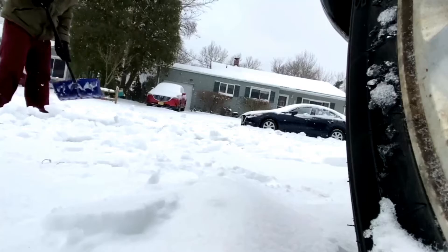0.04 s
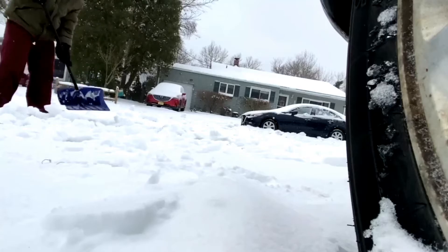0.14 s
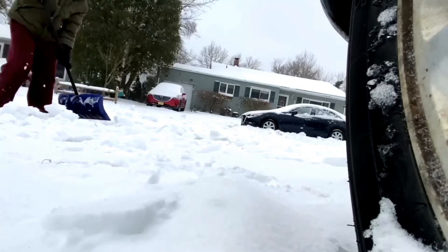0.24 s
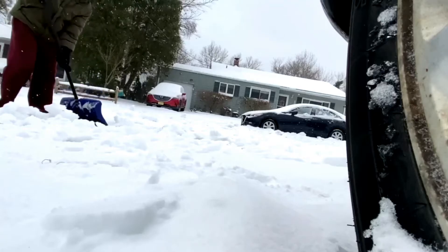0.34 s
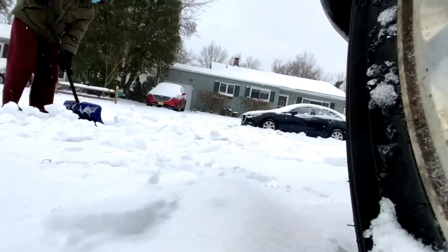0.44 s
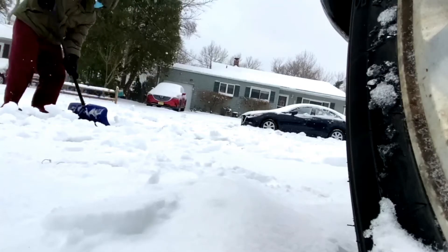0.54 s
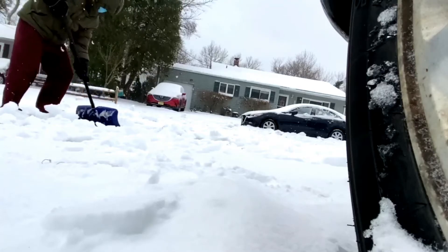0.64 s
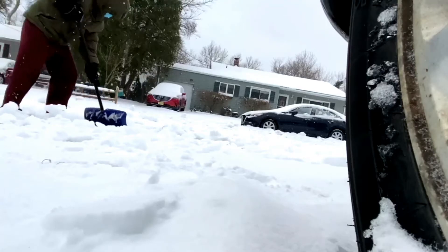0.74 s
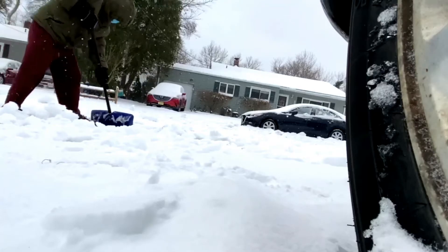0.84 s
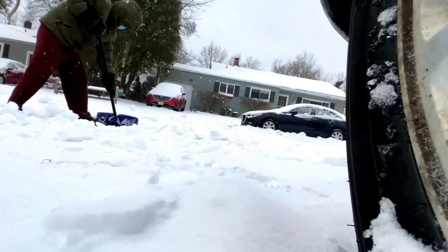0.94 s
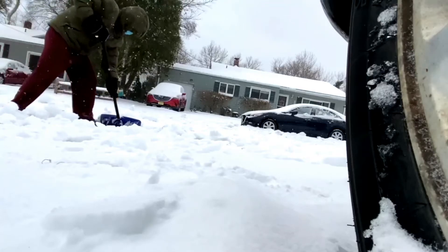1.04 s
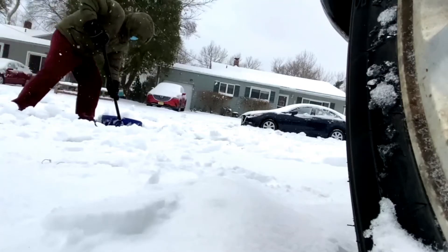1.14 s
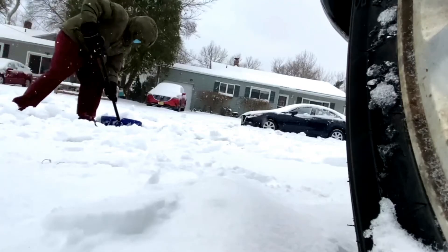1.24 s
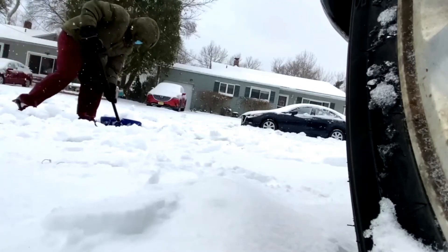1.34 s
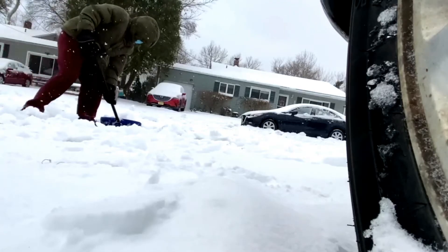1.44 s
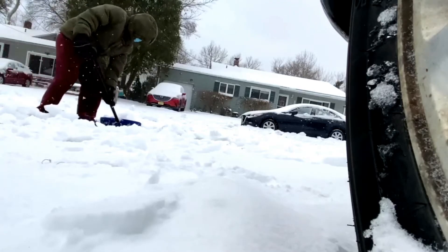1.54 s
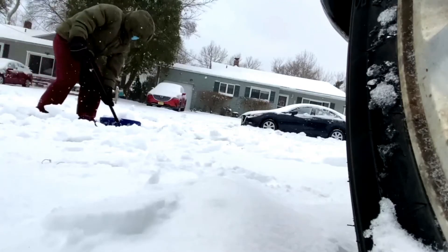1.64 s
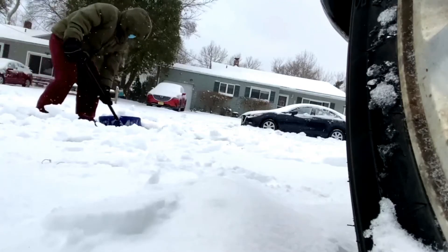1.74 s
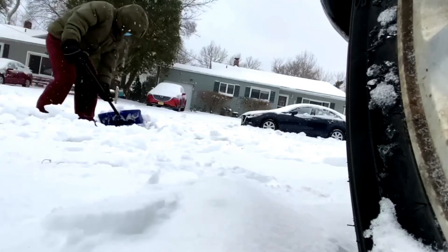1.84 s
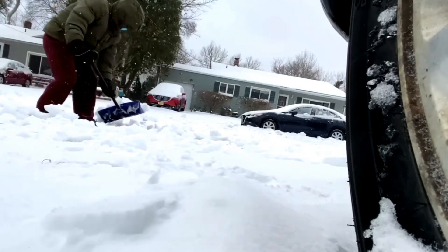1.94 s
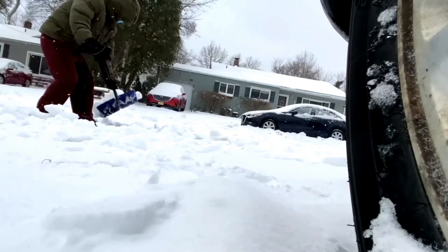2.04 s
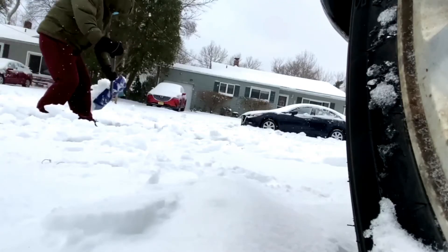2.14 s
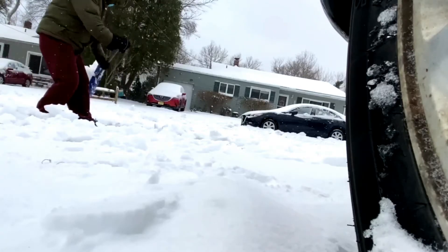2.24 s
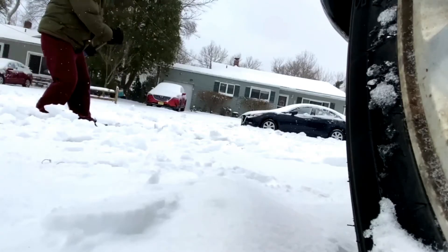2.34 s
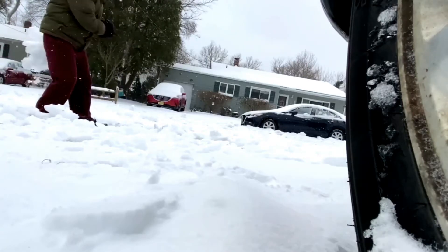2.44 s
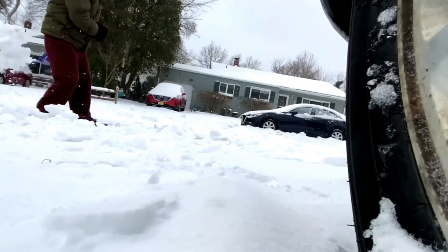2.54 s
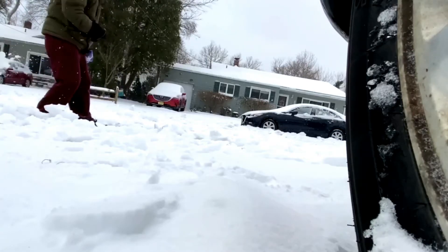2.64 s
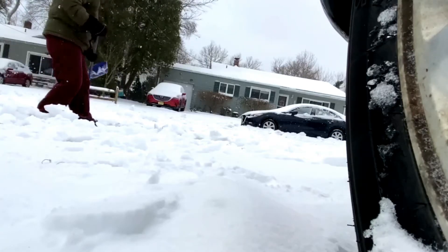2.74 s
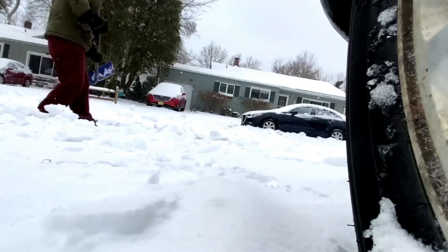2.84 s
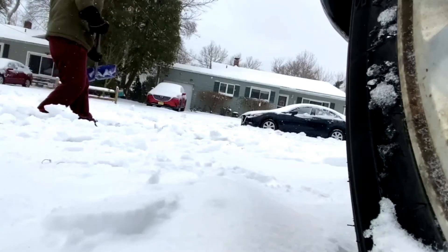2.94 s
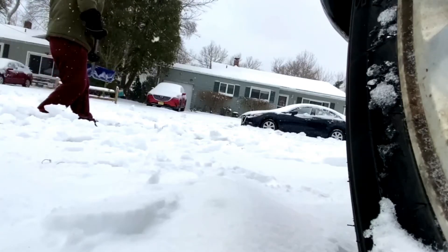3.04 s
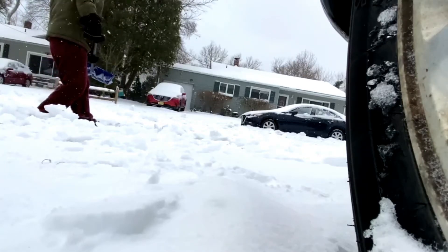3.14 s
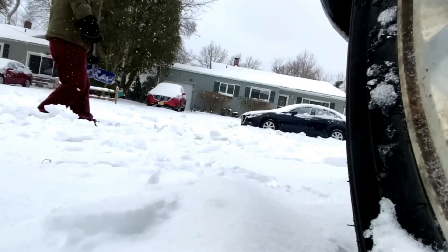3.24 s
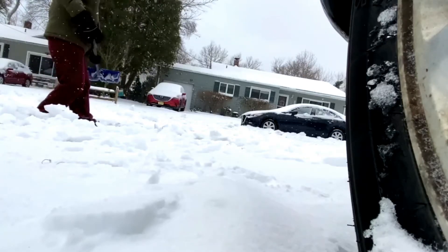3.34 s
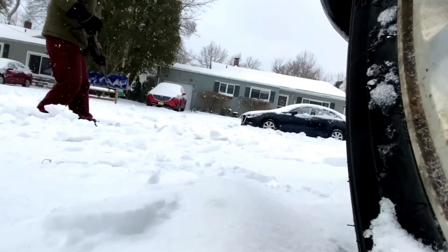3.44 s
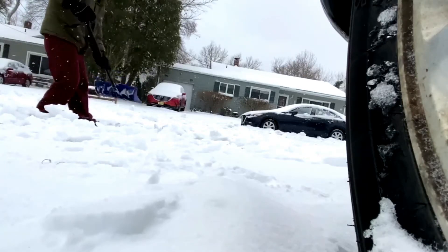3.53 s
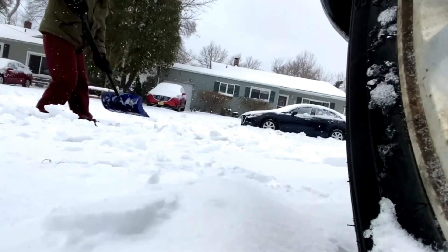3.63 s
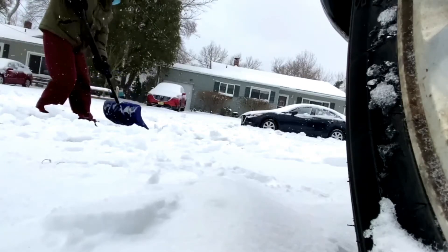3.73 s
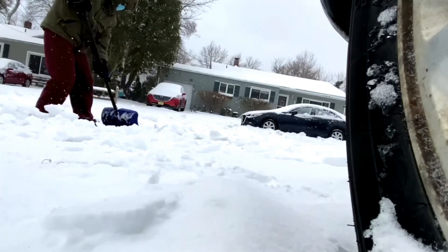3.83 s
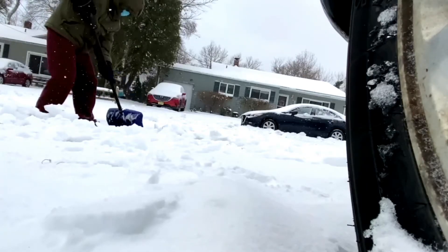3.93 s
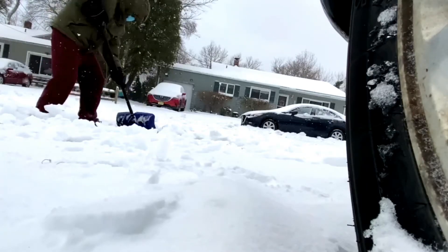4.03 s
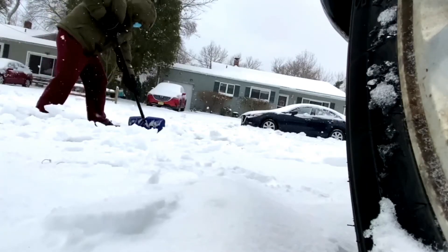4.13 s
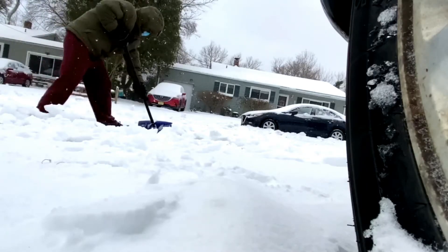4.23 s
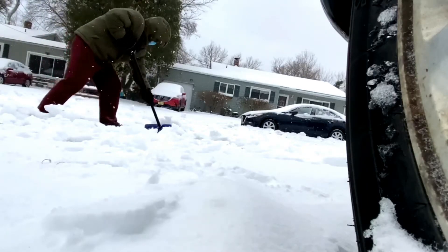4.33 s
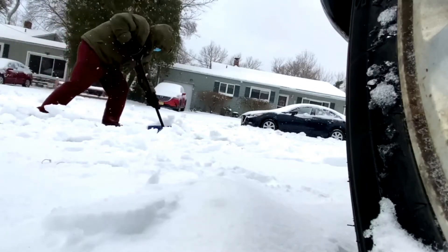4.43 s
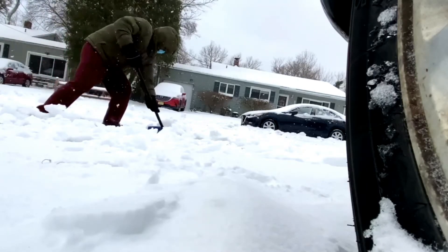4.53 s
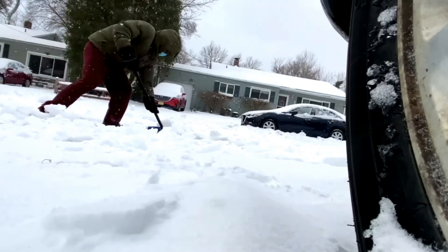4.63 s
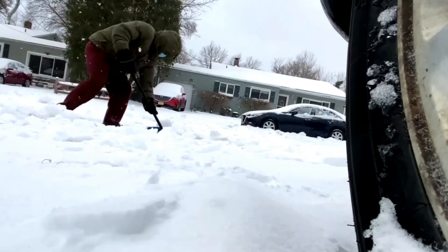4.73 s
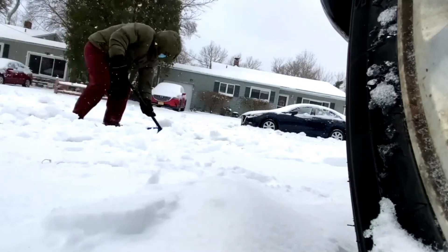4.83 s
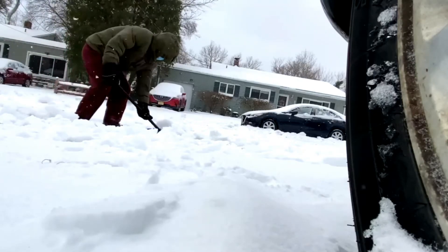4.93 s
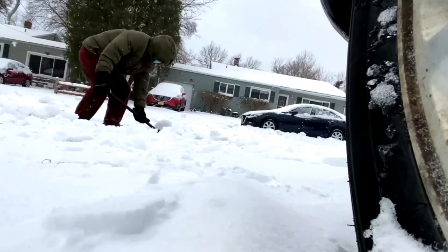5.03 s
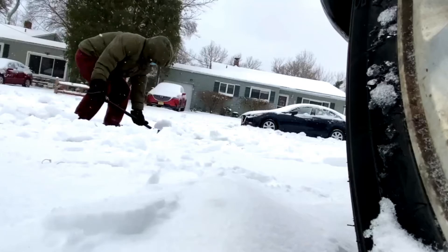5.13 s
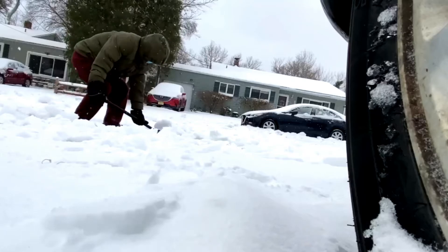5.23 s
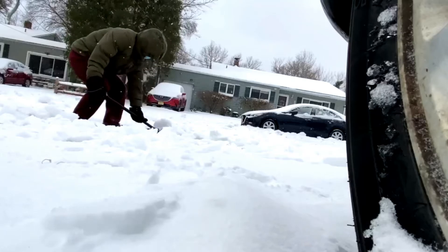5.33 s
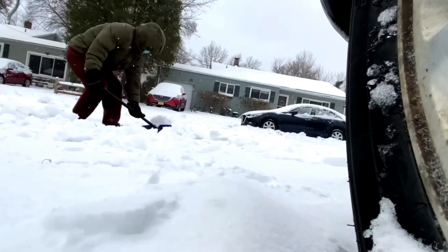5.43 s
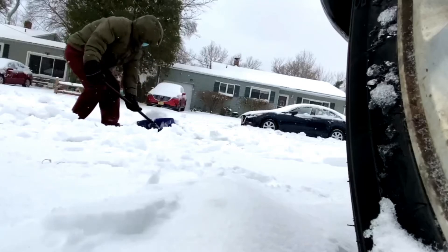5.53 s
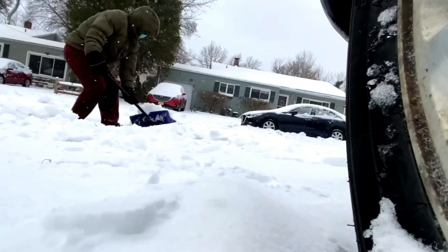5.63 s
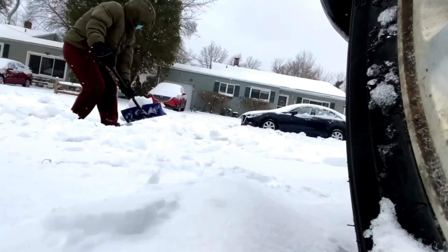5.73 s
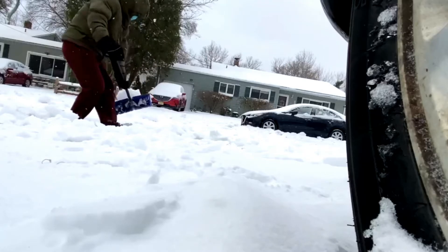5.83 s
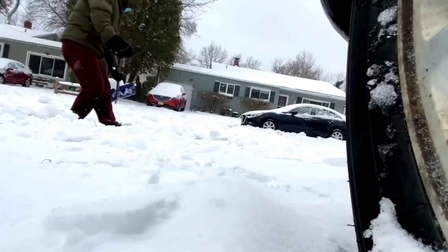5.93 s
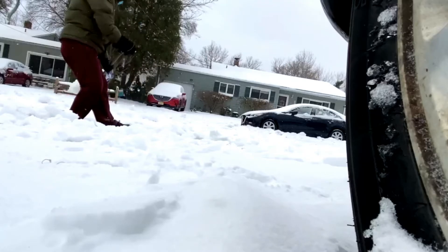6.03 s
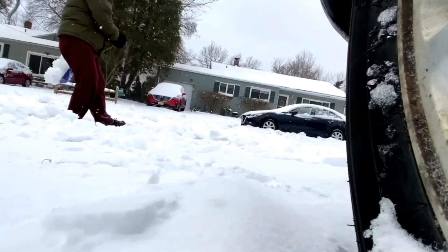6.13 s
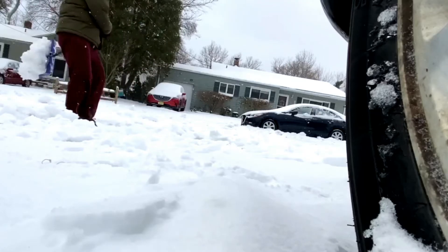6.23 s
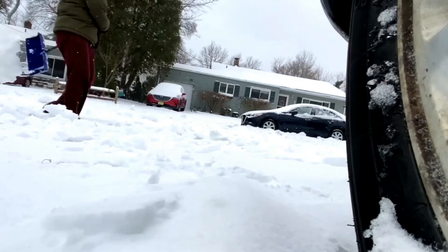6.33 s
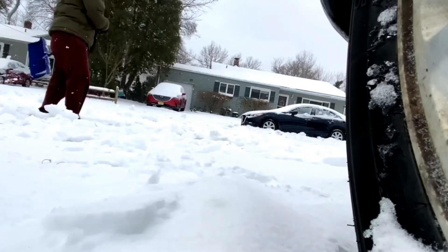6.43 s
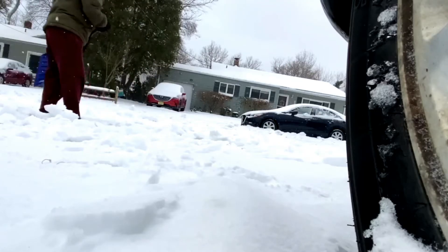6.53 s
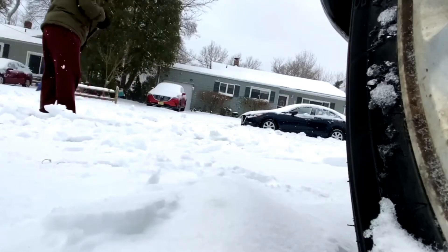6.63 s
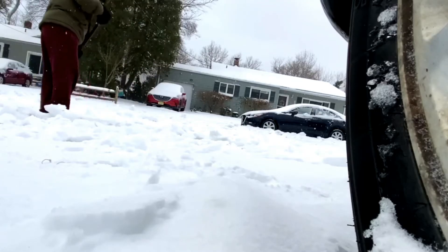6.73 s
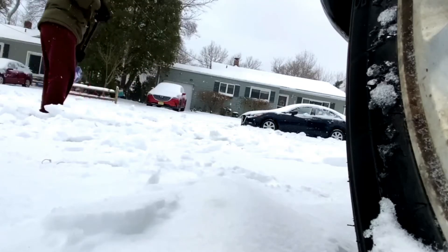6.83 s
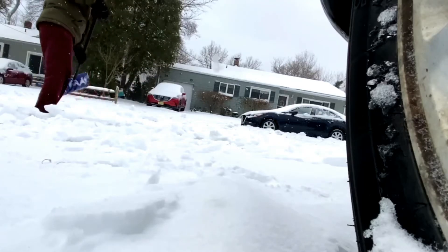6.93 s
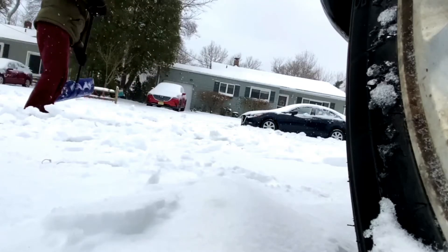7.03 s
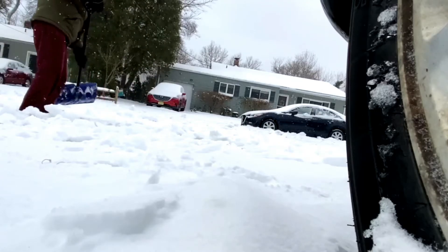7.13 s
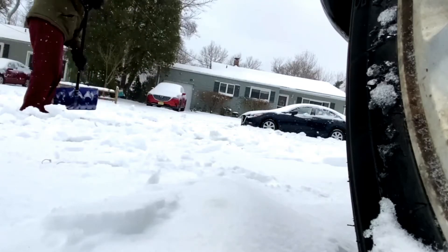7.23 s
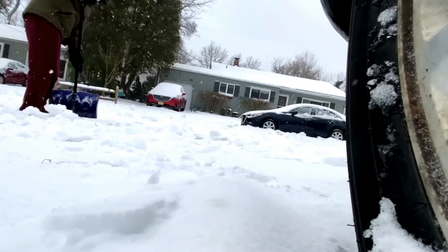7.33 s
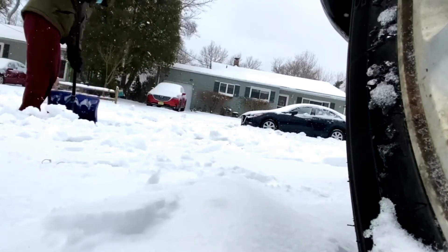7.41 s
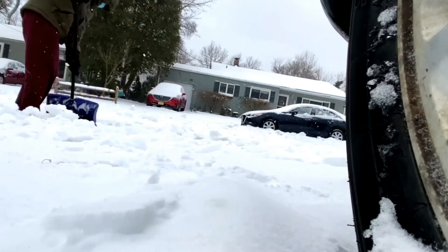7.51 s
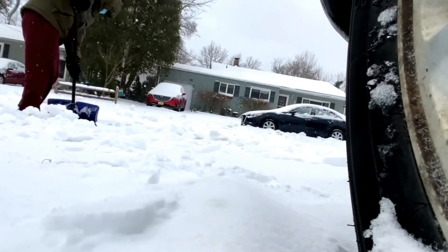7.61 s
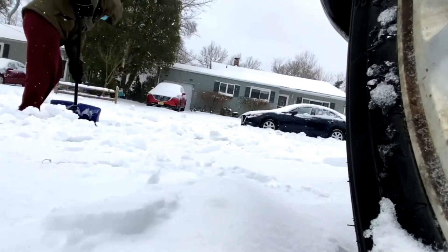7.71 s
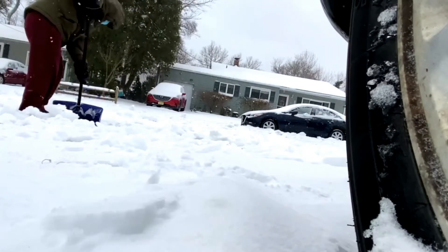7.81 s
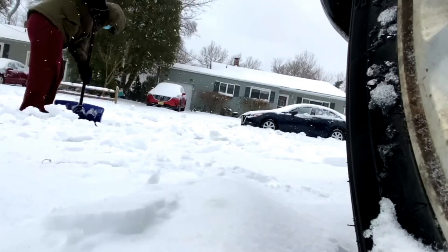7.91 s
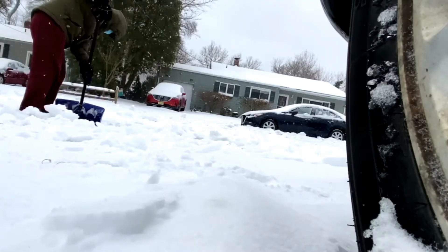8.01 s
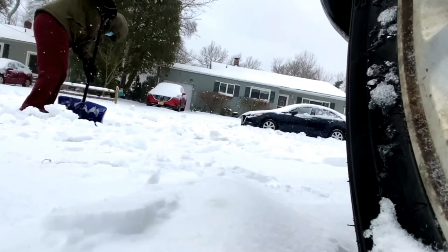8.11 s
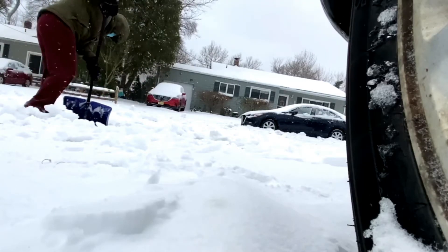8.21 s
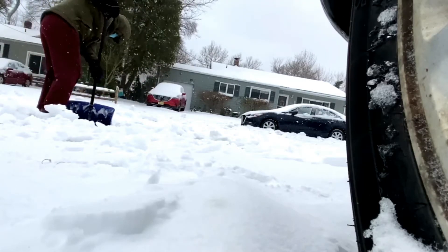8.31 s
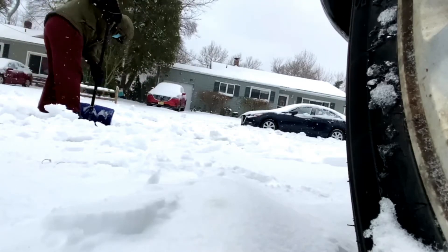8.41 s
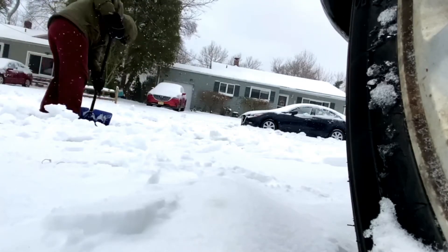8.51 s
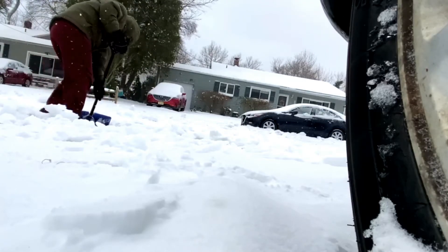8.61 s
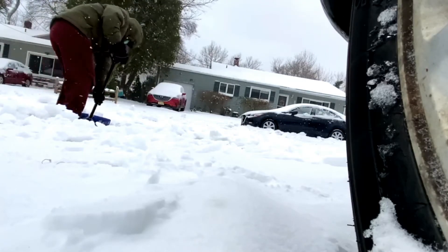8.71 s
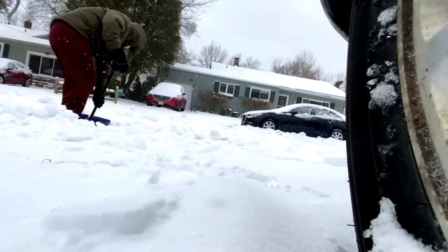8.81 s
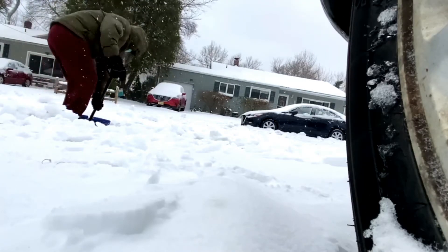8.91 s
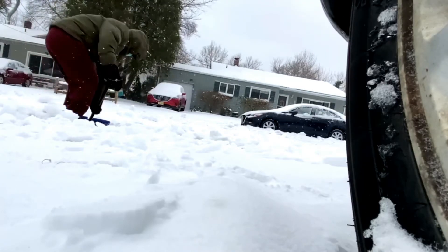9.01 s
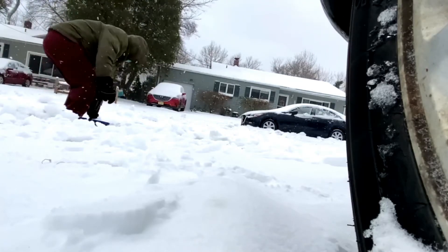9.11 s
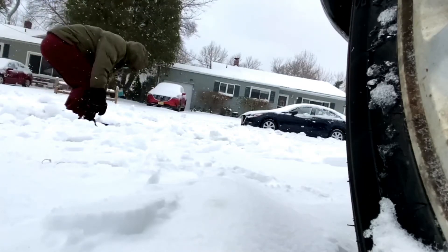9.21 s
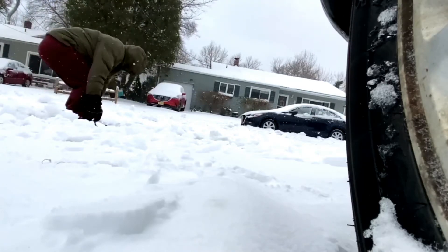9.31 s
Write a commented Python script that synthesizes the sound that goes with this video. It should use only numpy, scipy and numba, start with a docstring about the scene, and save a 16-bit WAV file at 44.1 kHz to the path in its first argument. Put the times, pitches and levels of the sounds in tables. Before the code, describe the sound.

A plastic snow shovel works on an outdoor driveway, a few metres from a microphone near the ground. From about 0.3 to 1 second it scrapes with a hollow drone, quick knocks and a gritty, icy hiss. Soft crunches and ticks follow, then thrown snow lands around 2.6 seconds with a powdery spray and dull thuds. At 3.7 seconds a sharp knock, the loudest sound, starts a second scrape with an icy click, lasting until about 4.4. Boots crunch quietly, and another load lands around 6.4 seconds with muffled thumps. After a knock near 7.1, short, stuttering scrapes and knocks run from 7.4 to about 8.6 seconds, followed by a faint last scrape and boots thudding in packed snow until about 9.3. A faint, low, engine-like rumble sits in the distance, swelling slightly around 2 seconds and then receding.

```python
"""Shovelling a snowy driveway

A plastic snow shovel is pushed in a few strokes, a few metres from a phone held near the ground.
The edge sticks and slips, so the scoop drones and knocks while ice grains rasp and hiss under it.
Between strokes boots thud and snow crunches and is tossed aside; far off, something like an engine
rumbles."""
import sys
import numpy as np
from scipy import signal
from scipy.fft import rfft, irfft
from scipy.io import wavfile
from scipy.ndimage import uniform_filter1d
from numba import njit

SR = 44100
rng = np.random.default_rng(int(sys.argv[2]) if len(sys.argv) > 2 else 0)


def to_wav(sig):
    """Store sig (one row per channel, or 1-D mono) as 16-bit WAV at the path in sys.argv[1].

    Samples outside -1..1 are clipped; the rate is SR.
    """
    pcm = np.clip(np.atleast_2d(sig), -1, 1) * 32767
    pcm = np.round(pcm).astype(np.int16)
    wavfile.write(sys.argv[1], SR, pcm.T)  # frames by channels


N = 412776
TIME = np.arange(N) / SR


def undb(db):
    """Decibels to gain."""
    return 10 ** (np.asarray(db) / 20)


def unit(x):
    """Scale to rms 1."""
    return x / np.sqrt(np.mean(x ** 2))


def curve(points):
    """Join (time, value) points by straight lines."""
    return np.interp(TIME, *np.transpose(points))


def add(track, start, sound):
    """Mix a short sound in at `start` seconds."""
    i = int(start * SR)
    track[i:i + len(sound)] += sound[:N - i]


def colour(x, spectrum):
    """Filter by (frequency, gain) points, falling away beyond both ends; rms 1."""
    hz, db = np.transpose(spectrum)
    f = np.maximum(np.fft.rfftfreq(N, 1 / SR), 1)
    skirts = np.minimum(f / hz[0], 1) ** 2 * np.minimum(hz[-1] / f, 1) ** 2
    gain = undb(np.interp(np.log(f), np.log(hz), db))
    return unit(irfft(rfft(x) * skirts * gain, N))


@njit
def bandpass(x, hz, width_hz):
    """State-variable band-pass with a moving centre, gain 1 there."""
    y, band, low = np.empty(len(x)), 0., 0.
    for i in range(len(x)):
        g, damping = np.tan(np.pi * hz[i] / SR), width_hz / hz[i]
        v = (band + g * (x[i] - low)) / (1 + g * (g + damping))
        band, low = 2 * v - band, low + 2 * g * v
        y[i] = damping * v
    return y


def resonate(x, modes):
    """Ring a set of steady (frequency, width, gain) resonances."""
    f = np.maximum(np.fft.rfftfreq(N, 1 / SR), 1)
    response = sum(undb(db) / (1 + 1j * (f * f - hz * hz) / (f * width)) for hz, width, db in modes)
    return irfft(rfft(x) * response, N)


def wander(rate):
    """Glide between random values, `rate` of them a second; rms 1."""
    hold = max(int(SR / rate), 2)
    steps = np.repeat(rng.standard_normal(N // hold + 1), hold)
    return unit(uniform_filter1d(steps, hold)[:N])


def grains(rate, spread_db):
    """Tiny fractures at random moments, about `rate` a second, their sizes set apart by `spread_db`."""
    size = undb(spread_db * np.minimum(rng.exponential(size=N), 5))
    breaks = rng.random(N) < rate / SR
    return unit(breaks * size * rng.choice([-1, 1], N))


def opposed(x, db):
    """A signal in opposite polarity left and right, for width."""
    return undb(db) * x * np.array([[1], [-1]])


def mic_pair(x, lag_s, pan_db):
    """One sound at the phone's two microphones; positive values make the left later and louder."""
    return np.array([np.interp(TIME - side * lag_s / 2, TIME, x) * undb(side * pan_db / 2)
                     for side in (1, -1)])


# the bass sits central below a corner that falls as the image opens: (time [s], frequency [Hz])
MONO_CORNER = [(1.7, 740), (2.6, 417), (3.7, 148), (4.6, 35)]
def above_bass(x):
    """The part of a sound that lies above the central bass at each moment."""
    f, t, bins = signal.stft(x, SR, nperseg=512)
    corner = np.interp(t, *np.transpose(MONO_CORNER))
    share = 1 / (1 + (corner / np.maximum(f, 1)[:, None]) ** 10)
    return signal.istft(bins * share, SR)[1][..., :N]


def low_mic_pair(x, pan_db, scatter=0, lag_s=0.00058):
    """A low sound and its scattered share at the two microphones; the deepest part stays central."""
    stereo = mic_pair(x, lag_s, pan_db) + opposed(scatter, db=3.5)
    return x + above_bass(stereo - x)


def reflect(x, lag_s=0.000272, count=4, drift_s=0.0002):
    """Treble echoes off scoop and ground shift as the shovel moves; a car beside the phone adds more."""
    treble = signal.sosfilt(signal.butter(2, 2200, "highpass", fs=SR, output="sos"), x)
    heard = x
    for delay in (np.arange(count) + rng.uniform(.6, 1.6, count)) * .0009:
        gain = 0.36 * rng.choice([-1, 1])
        heard = heard + gain * np.interp(TIME - delay - drift_s * wander(rate=4), TIME, treble)
    out = mic_pair(heard, -lag_s, pan_db=0.5)
    for mic in out:  # each microphone gets its own echoes off the car
        for delay in (np.arange(count) + rng.uniform(.6, 1.6, count)) * .0015:
            gain = 0.5 * rng.choice([-1, 1])
            mic += gain * np.interp(TIME - delay - drift_s * wander(rate=7), TIME, heard)
    return unit(out)


# the distant rumble drops away: (time [s], length [s])
RUMBLE_LULLS = [(0.0, 0.96), (7.058, 0.5), (8.87, 0.3)]
def rumble_gain(base_db=-43.5, swell_db=3, lull_db=-10, ramp_s=0.11):
    """The far rumble swells once and recedes, with soft-edged lulls."""
    swell = np.exp(-((TIME - 2.34) / 1.57) ** 2)
    lull = sum(np.clip(.5 + np.minimum(TIME - start, start + length - TIME) / ramp_s, 0, 1)
               for start, length in RUMBLE_LULLS)
    return undb(base_db + swell_db * swell + lull_db * lull)


# the far engine as it reaches the driveway: (frequency [Hz], gain [dB])
RUMBLE_SPECTRUM = [(35, -16), (55, 2), (110, 0), (175, -7.5), (300, -11), (420, -24.5), (560, -19.5),
                   (780, -30), (1200, -59)]
# still winter air around the phone: (frequency [Hz], gain [dB])
AIR_SPECTRUM = [(60, -15), (300, 2.5), (600, -14), (1200, -13.5), (3000, -21), (11500, -42.5)]
def street(hum_hz=50.34, waver_db=1.5, air_db=-59.5):
    """The background: a far engine's uneven rumble and wavering low note, over still winter air."""
    noise = rng.standard_normal((4, N))
    rumble = colour(noise[0] * undb(waver_db * wander(rate=12)), RUMBLE_SPECTRUM)
    hum = unit(resonate(noise[1], [(hum_hz, 4, 0)]))
    engine = (undb(-2.5) * rumble + undb(-6) * hum) * rumble_gain()
    echo = undb(-5) * np.roll(engine, SR // 20)  # off the house fronts
    mid, side = colour(noise[2:], AIR_SPECTRUM)
    air = undb(air_db) * (mid + opposed(above_bass(side), db=-3))
    return low_mic_pair(engine, pan_db=-1.5, scatter=echo, lag_s=0.00074) + air


def pressing(rows, attack_s, fade_s):
    """Pressure on snow: attack, hold and fade for each (time, level, length) row."""
    press, t = np.zeros(N), np.arange(SR // 2) / SR
    for start, db, length in rows:
        fade = np.exp(-np.maximum(t - length + fade_s, 0) / fade_s)
        add(press, start, undb(db) * np.minimum(t / attack_s, 1) * fade)
    return press


def clods():
    """Clods of snow fall with a low patter."""
    patter = colour(grains(rate=400, spread_db=4.5), [(140, -4.5), (330, -1), (600, -5.5)])
    return low_mic_pair(patter, pan_db=-0.5)


# dry snow crystals breaking: (frequency [Hz], gain [dB])
POWDER_SPECTRUM = [(950, 6), (1700, 5.5), (2300, 8.5), (3200, 3), (4800, 3.5), (8800, -4), (10300, 2),
                   (11800, -8)]
# boots step and the scoop lifts in loose snow: (time [s], level [dB], length [s])
SNOW_CRUNCHES = [(0.243, -49, 0.15), (1.338, -48.5, 0.074), (2.9, -60.5, 0.075), (3.716, -44, 0.024),
                 (4.69, -56.5, 0.077), (5.565, -51.5, 0.027), (6.02, -59, 0.12), (6.125, -53.5, 0.1),
                 (6.225, -53.5, 0.09), (6.9, -60, 0.07), (7.265, -55, 0.085)]
# faint rustle of snow and clothing between them: (time [s], level [dB])
RUSTLE_LEVELS = [(0, -63.5), (2.9, -62.5), (3.2, -74), (4.4, -65), (5.8, -66), (6.6, -64.5), (9.3, -65.5)]
def loose_snow(flurry_db=1.64):
    """Loose snow crunches as fine, dry grains and clods while it is pressed."""
    press = undb(curve(RUSTLE_LEVELS)) + pressing(SNOW_CRUNCHES, attack_s=0.015, fade_s=0.016)
    crystals = grains(rate=6000, spread_db=0) * undb(flurry_db * wander(rate=110))
    crunch = reflect(colour(crystals, POWDER_SPECTRUM), count=2)
    return (undb(-1) * crunch + undb(-2) * clods()) * press


# falling powder: (frequency [Hz], gain [dB])
SPRAY_SPECTRUM = [(1400, -1.5), (2100, 10), (3300, -4), (5000, 2), (6100, 5.5), (8900, -3.5), (10300, 6),
                  (11500, -12.5)]
# a thrown load lands: (time [s], level [dB], length [s])
SNOW_TOSSES = [(2.594, -46, 0.03), (2.62, -47.5, 0.19), (6.385, -48, 0.1), (6.49, -52.5, 0.12)]
def tossed_snow():
    """Snow thrown aside lands as a smooth, bright spray of powder with clods in it."""
    spray = reflect(colour(rng.standard_normal(N), SPRAY_SPECTRUM), count=1)
    landing = pressing(SNOW_TOSSES, attack_s=0.014, fade_s=0.044)
    return (undb(0.5) * spray + undb(-4) * clods()) * landing


# boots and clods pack the snow on the driveway: (time [s], level [dB], pitch [Hz])
SNOW_THUDS = [(2.627, -31.5, 204), (2.76, -33.5, 250), (2.792, -27, 130), (4.364, -30.5, 238),
              (6.4, -29.5, 72.6), (6.513, -33, 240), (6.939, -37.5, 268), (7.779, -28.5, 118),
              (7.844, -31.5, 80), (8.478, -27.5, 73), (8.636, -32, 73), (8.791, -29.5, 190),
              (9.02, -36, 302), (9.225, -27.5, 205), (9.309, -35.5, 342)]
def thuds(rise_s=0.0045, bump_db=-3, creak_db=-12):
    """Packed snow gives way with a dull bump and a longer muffled creak."""
    bumps, press, t = np.zeros(N), np.zeros(N), np.arange(SR // 4) / SR
    shape = t / rise_s * np.exp(1 - t / rise_s)
    for start, db, hz in SNOW_THUDS:
        add(bumps, start, undb(db + bump_db) * shape * np.sin(2 * np.pi * hz * t))
        add(press, start, undb(db + creak_db) * np.cbrt(shape) * np.minimum(t / rise_s, 1))
    fractures = grains(rate=1700, spread_db=-2.5)
    creak = colour(fractures, [(100, 8), (220, 18), (420, 0), (700, 0), (1500, -49)])
    return low_mic_pair(bumps + press * creak, pan_db=-3.5)


# the edge clicks on ice: (time [s], level [dB])
ICE_TICKS = [(0.29, -24.5), (1.18, -46), (2.106, -42), (2.173, -44), (2.5946, -35.5), (3.7122, -27.5),
             (4.118, -22), (7.128, -34.5), (7.413, -35)]
def ice_ticks(rise_s=0.00033, decay_s=0.0057, gain_db=-7):
    """A brittle crack of a few milliseconds where the edge meets ice."""
    bursts, t = np.zeros(N), np.arange(SR // 20) / SR
    for start, db in ICE_TICKS:
        add(bursts, start, undb(db + gain_db) * np.minimum(t / rise_s, 1) * np.exp(-t / decay_s))
    crack = colour(rng.standard_normal(N), [(1000, 8), (2200, 3.5), (8500, -1), (11000, -2.5)])
    return reflect(crack, count=1) * bursts


# the edge cracks through a lump of crust; the row at 3.714 s is an overtone of the scoop's knock: (time [s],
# level [dB], pitch [Hz])
CRUST_CLACKS = [(0.62, -40, 1040), (2.173, -51, 1300), (3.714, -29, 570), (4.118, -34.5, 1130),
                (7.461, -39, 1390), (8.866, -52, 1230)]
def crust_clacks(rise_s=0.0055, width_hz=190.0):
    """A cluster of fractures briefly rings the stiff edge, and once the scoop's knock rings an overtone; louder
    in the left microphone."""
    out, t = np.zeros(N), np.arange(SR // 16) / SR
    shape = t / rise_s * np.exp(1 - t / rise_s)
    for start, db, hz in CRUST_CLACKS:
        centre = np.full(len(t), float(hz))
        ring = bandpass(rng.standard_normal(len(t)), centre, width_hz)
        ring = unit(bandpass(ring, centre, 2 * width_hz))
        add(out, start, undb(db) * ring * shape)
    return mic_pair(out, lag_s=-0.00024, pan_db=7)


# the scoop lands or catches: (time [s], level [dB], pitch [Hz], rise [s])
SCOOP_KNOCKS = [(0.3, -25, 310, 0.0071), (0.33, -31, 318, 0.005), (0.399, -31, 302, 0.0054),
                (0.438, -25, 363, 0.002), (0.490, -30.5, 357, 0.0026), (0.541, -28.5, 347, 0.0032),
                (0.670, -22, 322, 0.00062), (0.720, -24, 305, 0.004), (0.802, -32, 500, 0.0022),
                (0.833, -29.5, 544, 0.0015), (0.912, -24, 297, 0.0044), (2.173, -42.5, 423, 0.0014),
                (3.715, -13, 232, 0.0007), (3.824, -28.5, 286, 0.011), (3.856, -20.5, 212, 0.007),
                (3.893, -24, 310, 0.0034), (4.082, -24.5, 494, 0.0024), (7.13, -29.5, 352, 0.0079),
                (7.475, -31.5, 535, 0.0053), (7.527, -27.5, 381, 0.0022), (8.255, -28, 575, 0.0054),
                (8.285, -26, 328, 0.0031), (8.468, -22.5, 407, 0.0018), (8.863, -36.5, 433, 0.0014)]
def scoop_knocks():
    """The scoop flexes with a short hollow note and two weaker overtones."""
    out, t = np.zeros(N), np.arange(SR // 4) / SR
    overtones = undb(-8) * np.sin(2 * np.pi * 490 * t) + undb(-13) * np.sin(2 * np.pi * 640 * t)
    for start, db, hz, rise in SCOOP_KNOCKS:
        t60 = 0.039 + 10.5 * rise  # a softer landing rings longer
        hardness = np.exp(-rise / 0.0061)  # and hardly wakes the overtones
        shape = (1 - np.exp(-(t / rise) ** 2)) * np.exp(-np.log(1000) * t / t60)
        note = np.sin(2 * np.pi * hz * t) + hardness * overtones
        add(out, start, undb(db) * note * shape / shape.max())
    return low_mic_pair(out, pan_db=-3)


# strokes along the driveway: (time [s], run-up [s], hold [s], stop [s], drone level [dB],
# rasp level [dB], hiss level [dB], first scoop note [Hz], last scoop note [Hz])
STROKES = [(0.282, .26, .39, .085, -32.8, -46.6, -37.6, 347, 290),
           (3.734, 0.15, 0.25, .2, -31.2, -40, -33.9, 165, 370),
           (7.419, 0.051, 0.043, 0.052, -32, -45.5, -35.5, 235, 241),
           (7.581, 0.041, 0.12, 0.041, -40.5, -56.5, -49.5, 250, 250),
           (8.104, 0.02, 0.067, 0.037, -40.5, -56, -49, 298, 338),
           (8.201, 0.06, 0.18, 0.2, -32, -48.4, -39.1, 307, 340),
           (8.81, 0.06, 0.02, 0.6, -49.5, -69, -64, 450, 540)]
# the edge bites harder or eases for a moment: (time [s], level change [dB])
EDGE_BITES = [(0.548, 2), (0.625, -0.5), (4.06, 3.5), (4.124, 4), (4.234, 7.5), (8.445, 2)]
def stroke_gain(layer, contact_db, piling_db_per_s, stop_db, bite_s=0.023):
    """One layer's gain: each stroke starts `contact_db` down, speeds up, piles up snow, then stalls."""
    gain = 0
    for start, run_up, hold, stop, drone_db, rasp_db, hiss_db, _, _ in STROKES:
        age = TIME - start
        full_db = {"drone": drone_db, "rasp": rasp_db, "hiss": hiss_db}[layer]
        starting = contact_db * np.clip(1 - age / run_up, 0, 1) ** 0.98
        piling = piling_db_per_s * np.clip(age - run_up, 0, hold)
        stalling = stop_db * np.maximum(age - run_up - hold, 0) / stop
        db = full_db - starting + piling - stalling
        gain = gain + undb(np.maximum(db, -200)) * (age >= 0)
    bite_db = sum(db * np.maximum(1 - np.abs(TIME - at) / bite_s, 0) for at, db in EDGE_BITES)
    return uniform_filter1d(gain, size=400) * undb(bite_db)


def scoop_note():
    """The main resonance glides during each stroke as the load on the scoop shifts."""
    points = []
    for start, run_up, hold, *_, first_hz, last_hz in STROKES:
        points += [(start, first_hz), (start + run_up + hold, last_hz)]
    return curve(points)


# resonances of the stiff edge: (frequency [Hz], width [Hz], gain [dB])
EDGE_MODES = [(1045, 23, -2), (1210, 39, -0.5), (1390, 81, -7.5), (1585, 70, -3.5), (1837, 49, 1.5),
              (2382, 39, 6), (3180, 200, -4.5), (4000, 300, -4)]
def flexing_edge(x, direct, bend=0.03):
    """The edge's resonances wander as it bends under load; a `direct` share passes straight through."""
    ring = sum(undb(db) * bandpass(x, hz * (1 + bend * wander(rate=8)), float(width))
               for hz, width, db in EDGE_MODES)
    return direct * x + ring


# coarse ice grains under the edge: (frequency [Hz], gain [dB])
RASP_SPECTRUM = [(480, -21), (720, 13), (920, 1.5), (1400, 5), (1900, -3.5), (2200, -14.5), (2600, -30.5),
                 (3200, -8)]
# fine ice grains under the edge: (frequency [Hz], gain [dB])
HISS_SPECTRUM = [(2000, -5.5), (2850, -3), (3200, -1.5), (4300, -1.5), (5600, 2.9), (7600, -2),
                 (9000, -7.5), (10400, 1.5), (11500, -7.5)]
def edge_scrape(flutter_db=0.77, grip_db=1.24):
    """Ice grains break under the edge in quick flurries: coarse ones rasp, fine ones hiss."""
    grip = undb(grip_db * wander(rate=31))  # the edge grips and lets go
    coarse = grains(rate=2000, spread_db=3) * undb(flutter_db * wander(rate=90))
    coarse = colour(flexing_edge(coarse, direct=0.52), RASP_SPECTRUM)
    fine = grains(rate=7000, spread_db=3) * undb(flutter_db * wander(rate=130))
    fine = colour(flexing_edge(fine, direct=0.6), HISS_SPECTRUM)
    rasp_gain = undb(2) * stroke_gain("rasp", contact_db=11.3, piling_db_per_s=7.4, stop_db=17.3)
    hiss_gain = stroke_gain("hiss", contact_db=13.7, piling_db_per_s=-21, stop_db=19.9)
    return (reflect(coarse, lag_s=0.00028) * rasp_gain + reflect(fine) * hiss_gain) * grip


# upper resonances of the plastic scoop: (frequency [Hz], width [Hz], gain [dB])
SCOOP_MODES = [(347.5, 31, 5), (496, 84, -0.5), (564, 21, 5.5), (753, 110, 1.5)]
def scoop_drone(main_width_hz=167.0, judder_db=3):
    """Stick-slip jolts ring the plastic scoop, heard direct and scattered from a few metres away."""
    judder = undb(judder_db * wander(rate=40))
    rings = []
    for _ in range(2):
        slips = grains(rate=480, spread_db=1) * judder
        ring = bandpass(slips, scoop_note(), main_width_hz) + resonate(slips, SCOOP_MODES)
        rings.append(colour(ring, [(110, -8), (190, 2), (650, -1.5), (900, -13), (1500, -57)]))
    direct, scattered = rings
    gain = undb(-2.5) * stroke_gain("drone", contact_db=3.3, piling_db_per_s=-0.95, stop_db=14.5)
    return low_mic_pair(direct, pan_db=-0.5, scatter=undb(-8) * scattered) * gain


def scene():
    """Shovel, snow and street as they reach the two microphones near the ground."""
    shovel = scoop_drone() + edge_scrape() + scoop_knocks() + crust_clacks() + ice_ticks()
    return shovel + thuds() + loose_snow() + tossed_snow() + street()


def record(dry):
    """The phone thins the deepest lows and cuts the top."""
    low_cut = signal.butter(2, 36, "highpass", fs=SR, output="sos")
    top_cut = signal.ellip(10, .2, 80, 11800, fs=SR, output="sos")
    return signal.sosfilt(top_cut, signal.sosfilt(low_cut, dry))


dry = scene()
out = record(dry)
to_wav(out)
```